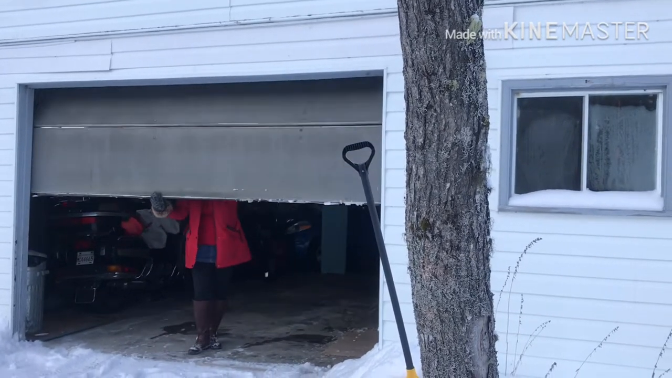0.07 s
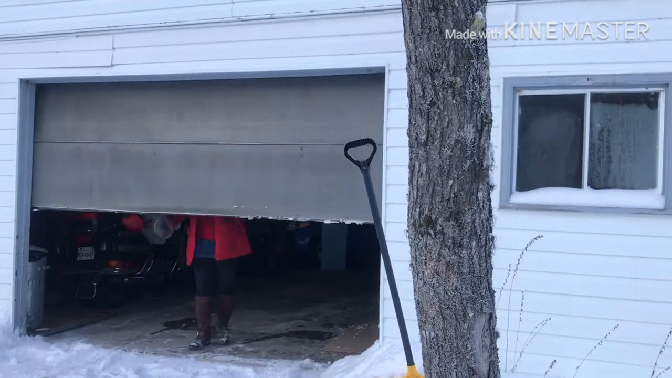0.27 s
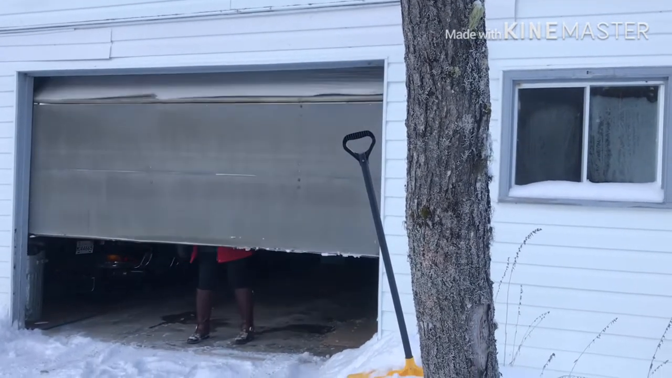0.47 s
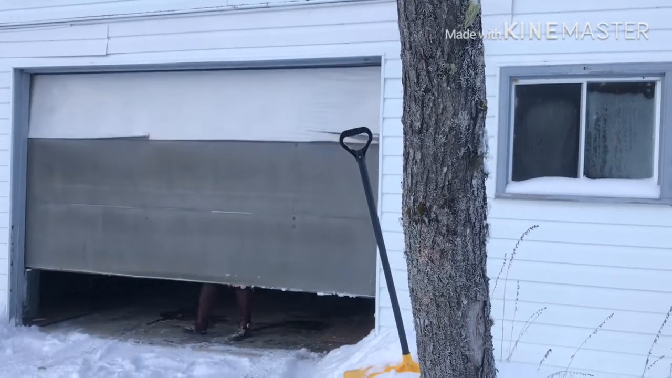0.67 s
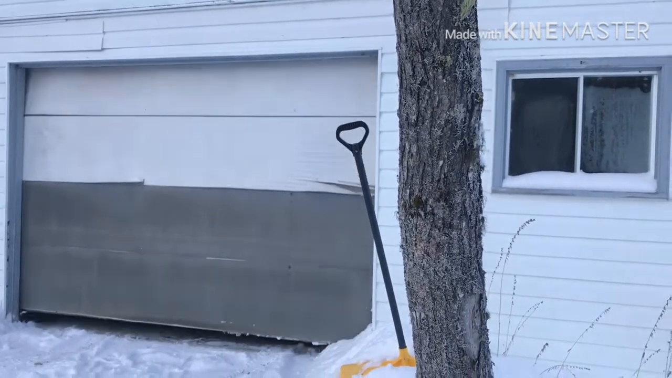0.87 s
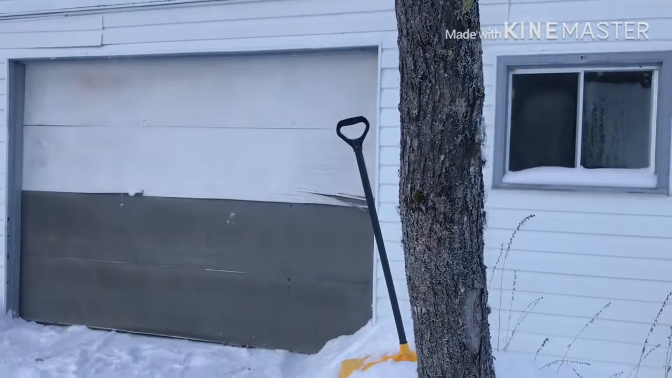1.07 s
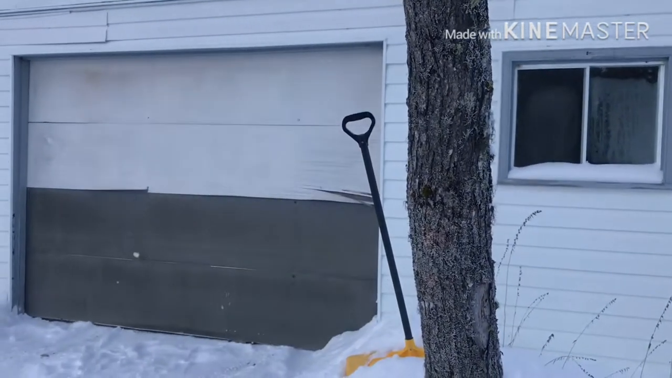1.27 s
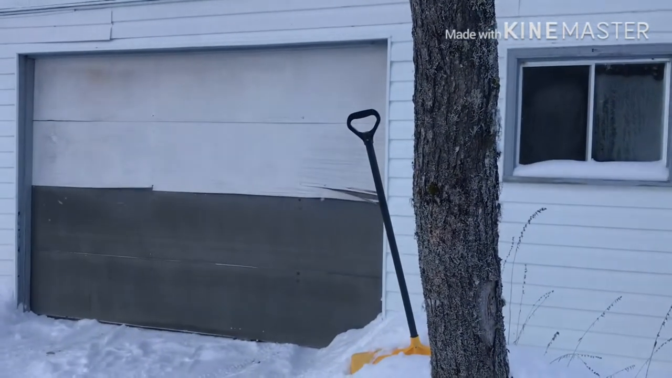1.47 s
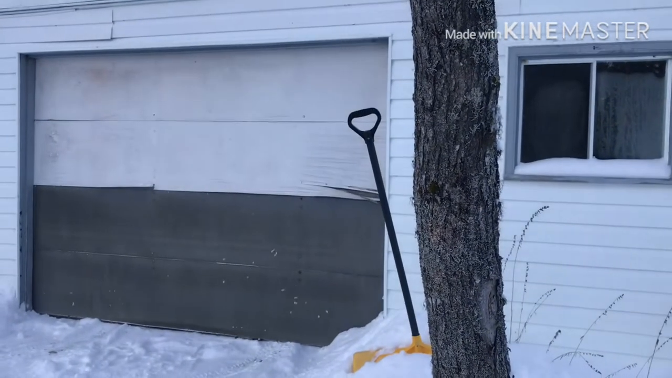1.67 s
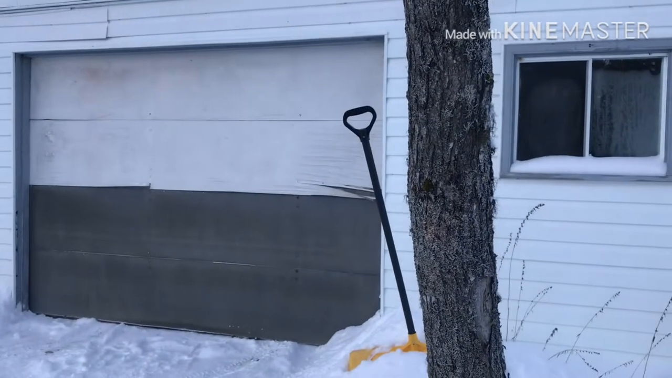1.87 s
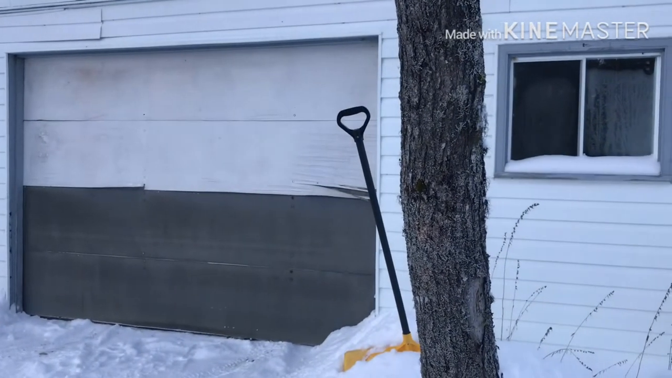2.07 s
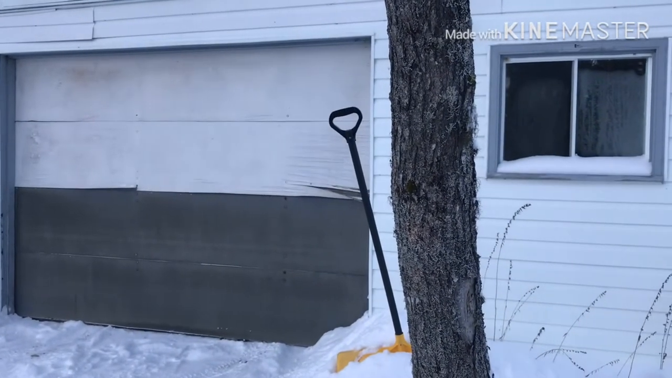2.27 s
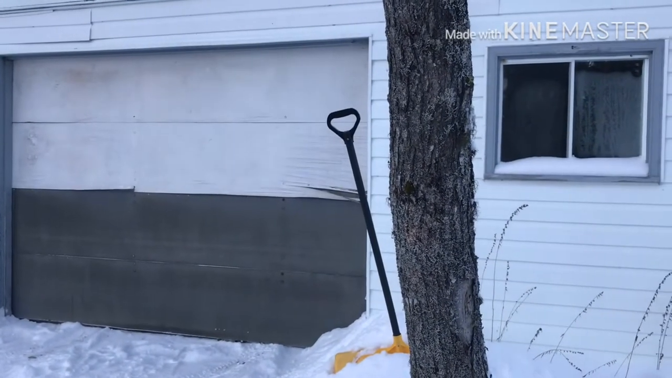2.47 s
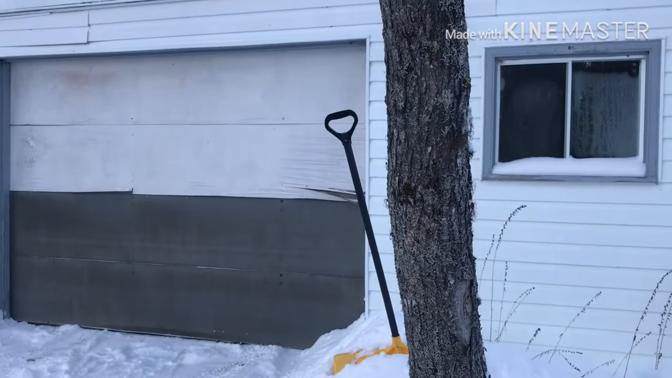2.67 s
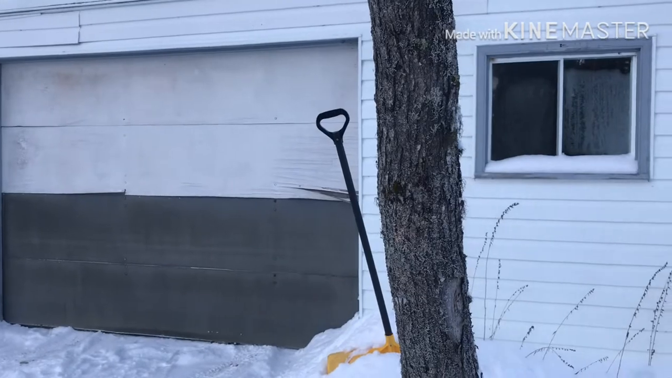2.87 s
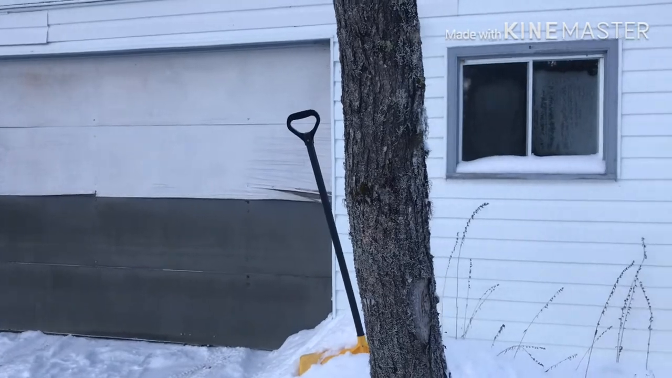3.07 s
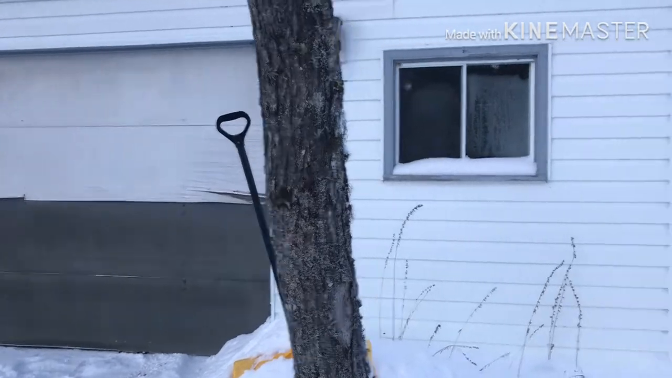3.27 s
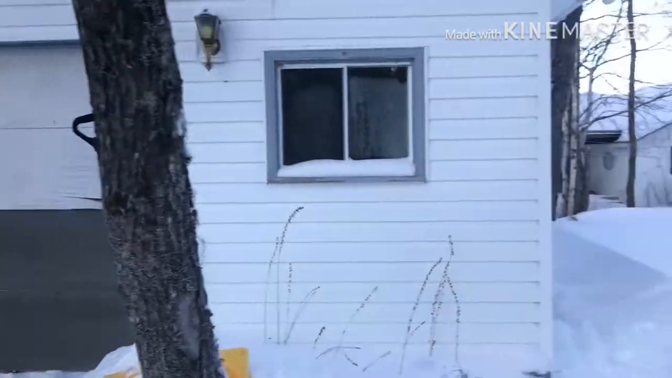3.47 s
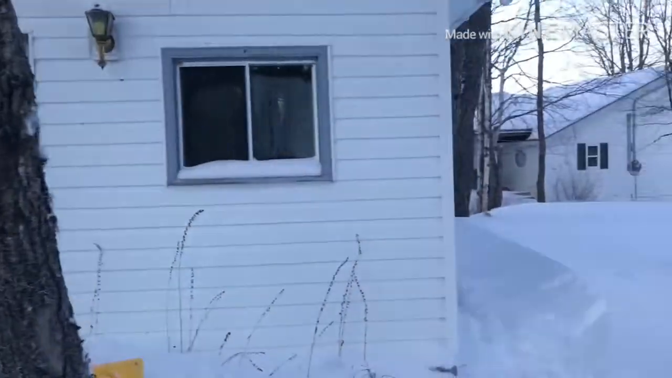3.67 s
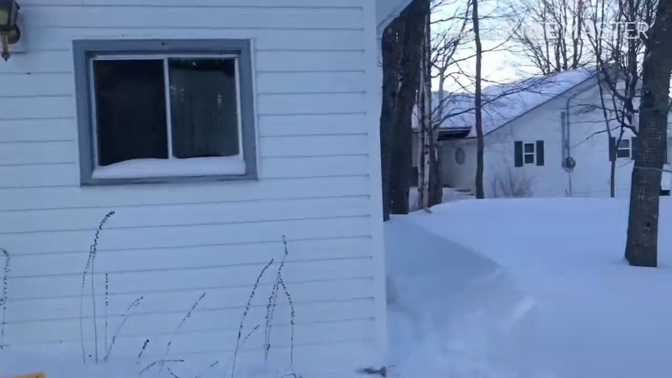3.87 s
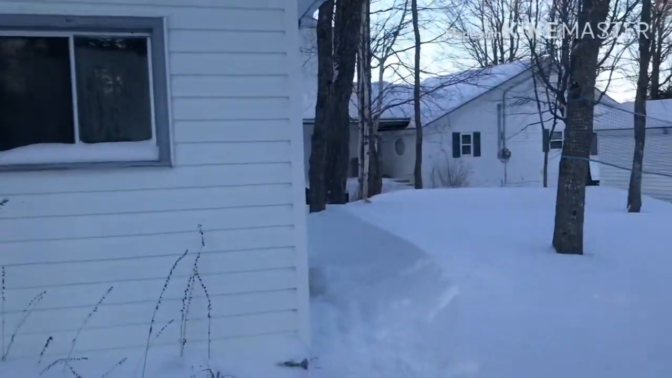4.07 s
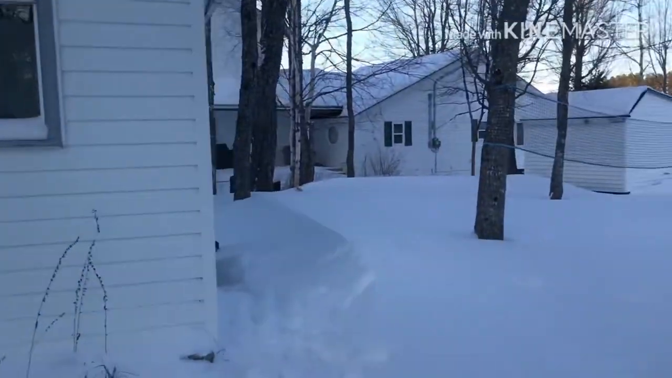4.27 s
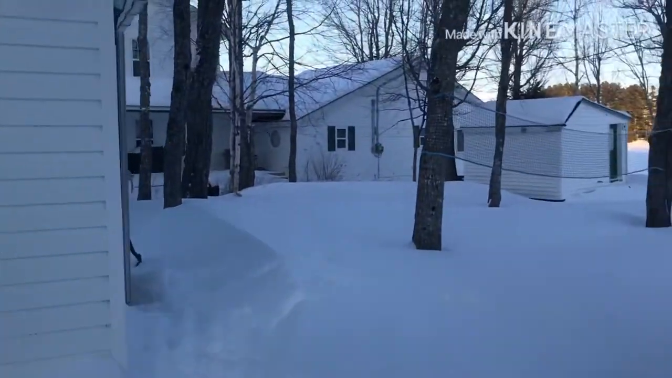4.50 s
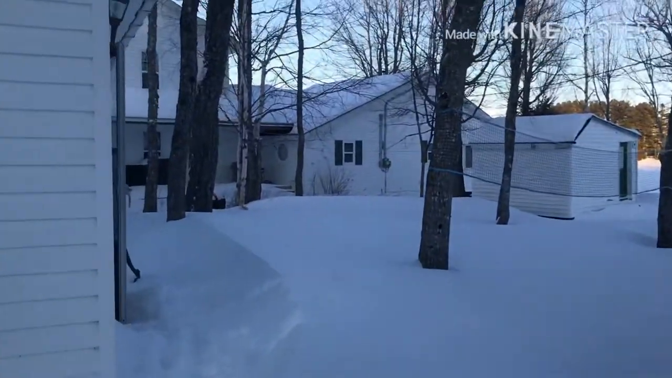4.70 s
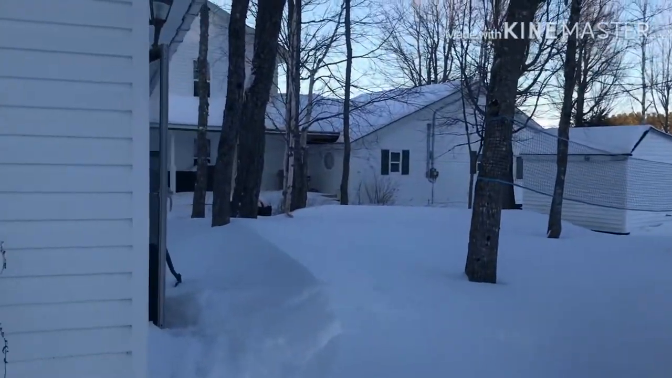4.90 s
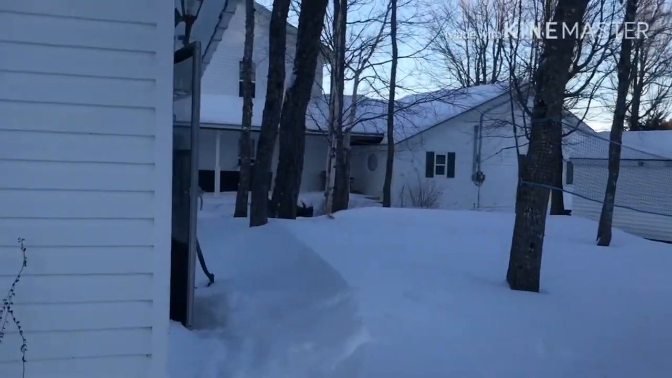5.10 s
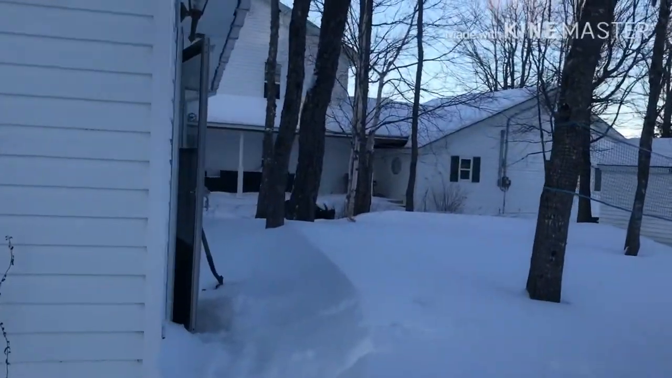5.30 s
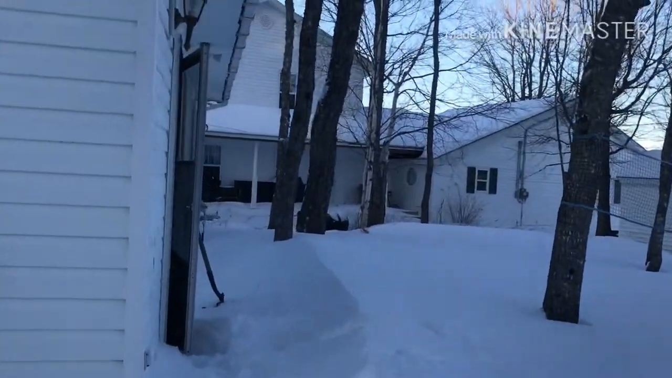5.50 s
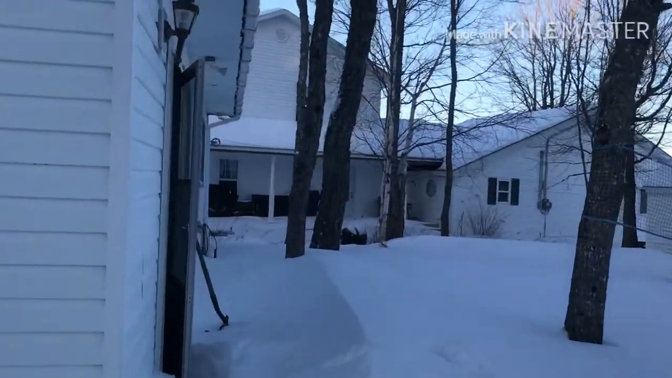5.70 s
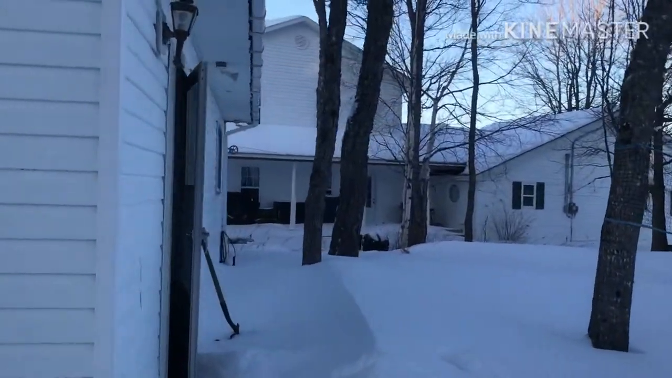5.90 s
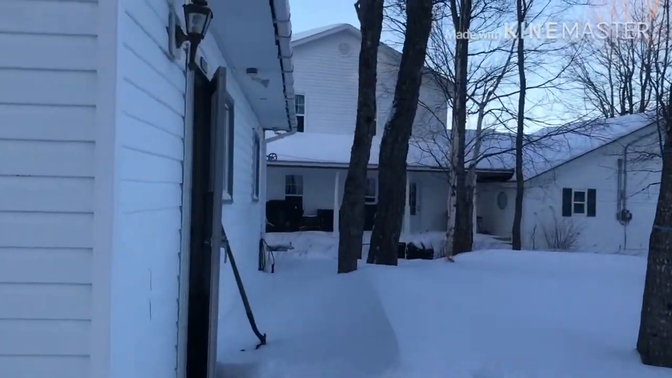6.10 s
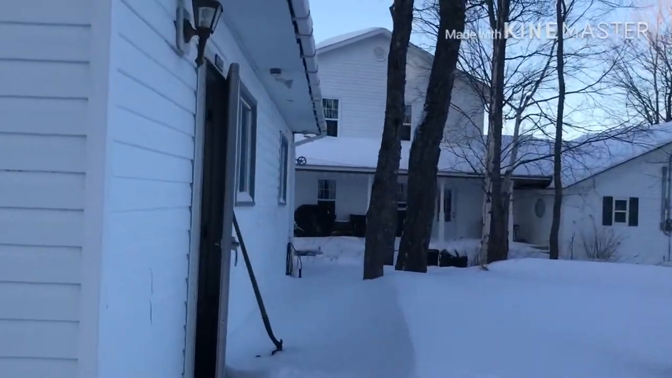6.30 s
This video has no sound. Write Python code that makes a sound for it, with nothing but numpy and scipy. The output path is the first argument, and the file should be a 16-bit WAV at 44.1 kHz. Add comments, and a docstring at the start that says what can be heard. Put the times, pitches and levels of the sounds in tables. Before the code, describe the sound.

From a few metres away, a garage door clatters down its tracks with dry knocks and one bright metallic ping, then slams with a boomy wooden thud and rattling bounces. After a pause the bolt clicks home. Beneath it an engine idles with a throbbing low hum. Later come crisp snow steps, cloth brushing and dull handling taps close to the microphone, while the engine weakens.

```python
"""A wooden sectional garage door is pulled down by hand on a still, snowy day: rollers rumble and knock, a steel
pin pings, and the door bangs on the ground and bounces; these are filtered clicks, noise bursts and ringing modes.
An idling engine, summed from orders of its firing rate, beats against a steady hum of sines. A latch snaps home;
later snow crunches underfoot in short rings, and gloves and coat near the microphone rustle in filtered clicks."""
import sys
import numpy as np
from scipy import signal
from scipy.fft import rfft, irfft
from scipy.io import wavfile

SR = 44100
rng = np.random.default_rng(int(sys.argv[2]) if len(sys.argv) > 2 else 0)


def output_pcm(signal):
    """Save a mono or channel-first signal as 16-bit PCM at the path in sys.argv[1].

    Samples are clipped to [-1, 1] before scaling.
    """
    pcm = np.clip(np.atleast_2d(signal).T, -1, 1) * 32767
    wavfile.write(sys.argv[1], SR, np.round(pcm).astype(np.int16))


N = 279946
TIME = np.arange(N) / SR
EDGES = 40 * 2 ** np.arange(0, 8.8, .5)   # half-octave band edges, Hz
TINY = 1e-18   # keeps the filters from underflowing in silence

# relative spectrum of a dry contact, shared by cracks, scrape and cloth: frequency_hz, level_db (per Hz)
CONTACT_SPECTRUM = [(200, -39), (600, -0.5), (1500, -0.5), (2600, 1.5), (3300, -1.5), (5500, -5.5),
                    (7500, -5), (10000, -13), (13500, -14), (16000, -12)]
# the microphone turns from the engine: time_s, loss_db (gain of the upper orders, other layers take a share)
TURNED_AWAY = [(1.3, -0.5), (2.6, 0.5), (4.0, -2), (4.5, -5.5), (5.2, -9.5), (6.35, -15)]


def amp(db):
    """Decibels to gain."""
    return 10 ** (np.asarray(db) / 20)


def rms_one(x):
    """Scale to unit rms."""
    return x / np.sqrt(np.mean(x ** 2) + 1e-20)


def in_time(rows, outside=None):
    """Columns of a table as sample curves; outside is the value beyond its ends."""
    s, *columns = np.transpose(rows)
    return [np.interp(TIME, s, column, outside, outside) for column in columns]


def at_hz(points, hz):
    """A spectrum read on a log-frequency axis."""
    point_hz, level_db = np.transpose(points)
    return np.interp(np.log(hz), np.log(point_hz), level_db)


def drift(rate_hz):
    """Slow random wander of spread 1: noise through two equal low-pass poles at rate_hz."""
    step = 40   # samples between the points that are drawn
    r = np.exp(-2 * np.pi * rate_hz * step / SR)
    white = rng.standard_normal(N // step + 2002)
    slow = signal.lfilter([1], [1, -2 * r, r * r], white)[2000:]   # settled part only
    return np.interp(np.arange(N) / step, np.arange(len(slow)), rms_one(slow))


def swell(peak_s, peak_db, rise_s, t60_s):
    """Gain that climbs 60 dB in rise_s to each peak and falls 60 dB in t60_s; powers add."""
    power = np.zeros(N)
    for s, db, fall_s in np.broadcast(peak_s, peak_db, t60_s):
        distance = np.maximum((s - TIME) / rise_s, (TIME - s) / fall_s)
        power += amp(2 * (db - 60 * distance))
    return np.sqrt(power)


def band_pass(x, low_hz, high_hz, order=2):
    """Keep one band of the signal."""
    return signal.sosfilt(signal.butter(order, [low_hz, high_hz], "band", fs=SR, output="sos"), x)


def bands(sources):
    """Half-octave bands as (centre Hz, signal); neighbours come from unrelated sources."""
    for k, (low, high) in enumerate(zip(EDGES, EDGES[1:])):
        yield np.sqrt(low * high), band_pass(sources[k % 2], low, high)


def low_noise(low_hz, high_hz):
    """A band of bass noise; rms 1."""
    return rms_one(band_pass(rng.standard_normal(N), low_hz, high_hz, order=3))


def coloured(spectrum):
    """Smooth noise with the given spectrum; rms 1."""
    hz = np.maximum(np.fft.rfftfreq(N, 1 / SR), 1)
    return rms_one(irfft(rfft(rng.standard_normal(N)) * amp(at_hz(spectrum, hz)), N))


def grains(per_s, spread_db):
    """Two trains of random clicks of uneven size and either sign."""
    luck = np.minimum(rng.exponential(1, (2, N)), 4)
    sizes = amp(spread_db * luck) * rng.choice([-1, 1], (2, N))
    hits = rng.random((2, N)) < per_s / SR
    return rms_one(sizes * hits) + TINY


def ring(modes, blows, spread_db, longest_s, lag_cycles):
    """Each blow (s, dB) strikes every decaying mode with a strength of its own; low modes answer later."""
    s, db = np.transpose(blows)
    luck = rng.normal(0, 1, (len(s), len(modes)))
    out = np.zeros(N)
    for k, (hz, level_db, t60_s) in enumerate(modes):
        r = amp(-60 / (np.clip(t60_s, .01, longest_s) * SR))
        w = 2 * np.pi * hz / SR
        clicks = np.full(N, TINY)
        at = ((s + lag_cycles / hz) * SR).astype(int)
        clicks[at] = amp(db + level_db + spread_db * luck[:, k]) * (-1) ** k
        out += signal.lfilter([0, np.sin(w)], [1, -2 * r * np.cos(w), r * r], clicks)
    return out


def cracks(rows, t60_s, snap_db, lows_last):
    """A sharp snap and a burst of noise that dies band by band, the lows more slowly; t60_s holds at 3 kHz."""
    out, after = np.zeros(N), TIME[:SR // 4]
    white = rng.standard_normal((2, N))
    rise_s = .0012   # the contact builds up before it snaps
    rise = np.minimum(after / rise_s, 1) ** 2
    for k, (low, high) in enumerate(zip(EDGES, EDGES[1:])):
        hz = np.sqrt(low * high)
        octaves = np.log2(hz / 3000)
        burst = rise * amp(-60 * after / (t60_s * (hz / 3000) ** -lows_last))
        shape, snaps = np.zeros(N + len(after)), np.zeros(N)
        for s, crack_db, tilt_db in rows:
            level_db = crack_db + at_hz(CONTACT_SPECTRUM, hz) + tilt_db * octaves
            i = int(s * SR)
            shape[i:i + len(after)] += amp(level_db) * burst
            snaps[i + round(rise_s * SR)] = amp(level_db + snap_db) * (-1) ** k
        out += band_pass(shape[:N] * white[k % 2] + snaps + TINY, low, high)
    return out


def rolling():
    """Rollers send dense clicks into panels and track, louder with speed and after each jolt."""
    # loudness of the rolling, following the door's speed: time_s, level_db
    roll_table = [(0.0, -37.5), (0.05, -49.5), (0.3, -49.5), (0.45, -43.5), (0.62, -43), (0.72, -41.5),
                  (0.83, -36.5), (0.92, -43.5), (0.95, -36.5), (1.2, -58), (1.45, -76)]
    # jolts that shake the whole door: time_s, panel_boom_db, wood_rumble_db, roller_rattle_db
    jolt_table = [(0.004, -43, -68, -57.5), (0.536, -49, -51, -38), (0.786, -39, -35, -47),
                  (0.828, -52, -32.5, -52), (0.873, -35.5, -49, -23), (0.888, -38, -29, -20.5),
                  (0.903, -37, -36, -31), (0.945, -22.5, -21.5, -27), (1.026, -32.5, -36, -32),
                  (1.068, -36, -46, -43), (1.105, -38.5, -48, -57), (1.118, -49, -39, -45),
                  (1.23, -41.5, -50, -50)]
    # relative spectra of the roller contact and its hiss: frequency_hz, level_db (per Hz)
    rumble_spectrum = [(150, -31), (230, -2), (400, 8), (620, 2), (900, 8), (1400, -1), (2200, -10),
                       (3200, -41)]
    hiss_spectrum = [(880, -57), (1500, 9.5), (2230, 7), (2390, 9.5), (3880, 2.5), (5770, 3), (7240, -1.5),
                     (14500, -11.5), (16000, -36)]
    boom_db, wood_db, hiss_db = -3.5, 1, -4   # rolling layers against the roller rattle
    jolt_rise_s, boom_lag_s, jolt_hiss_db = 0.062, 0.0064, -16.5   # the boom answers late

    contact = []
    for hz, band in bands(grains(per_s=1300.0, spread_db=2.8)):
        contact.append((hz, amp(at_hz(rumble_spectrum, hz) + 2.0 * drift(42.0)) * band))
    wood = rms_one(sum(band for hz, band in contact if hz < 650))
    rattle = rms_one(sum(band for hz, band in contact if hz > 650))
    hiss = 0
    for hz, band in bands(grains(per_s=6000.0, spread_db=1.2)):
        hiss = hiss + amp(at_hz(hiss_spectrum, hz) + 2.45 * drift(30.0)) * band

    roll = amp(in_time(roll_table, outside=-120)[0])
    s, jolt_boom_db, jolt_wood_db, jolt_rattle_db = np.transpose(jolt_table)
    boom_jolt = swell(s + boom_lag_s, jolt_boom_db, jolt_rise_s, t60_s=0.39)
    wood_jolt = swell(s, jolt_wood_db, jolt_rise_s, t60_s=0.28)
    rattle_jolt = swell(s, jolt_rattle_db, jolt_rise_s, t60_s=0.12)
    return (np.hypot(amp(boom_db) * roll, boom_jolt) * low_noise(51, 181)
            + np.hypot(amp(wood_db) * roll, wood_jolt) * wood
            + np.hypot(roll, rattle_jolt) * rattle
            + np.hypot(amp(hiss_db) * roll, amp(jolt_hiss_db) * rattle_jolt) * rms_one(hiss))


def knocks():
    """Hinges, rollers, the ground blow and its bounces crack and ring the panels."""
    # blows: time_s, level_db (of the crack, relative), tilt_db (per octave about 3 kHz)
    knock_table = [(0.0024, -29.5, -1), (0.159, -33.5, 1), (0.184, -32.5, -2), (0.2064, -31, 4.5),
                   (0.2239, -30, 2.5), (0.281, -43, -10.5), (0.372, -38, 5), (0.4242, -34, -3.5),
                   (0.4543, -30, -1), (0.473, -30.5, 0), (0.5104, -26, 5), (0.5221, -17, 1.5),
                   (0.531, -24, 7.5), (0.7048, -34, -1), (0.7428, -38, -12), (0.7573, -25.5, 2),
                   (0.7905, -21, 1.5), (0.845, -28, 1.5), (0.8576, -27, -1), (0.8739, -26, -10),
                   (0.9099, -30, 1), (0.9338, -30.5, -9.5), (0.9395, -12, -6), (0.9485, -30, 8.5),
                   (0.958, -27, 6.5), (1.0228, -29.5, 5), (1.0603, -36.5, 8), (1.0672, -52, 3),
                   (1.1159, -20, 0.5), (1.1457, -38, -3), (1.2314, -43, -3.5), (1.8195, -48, 1.5)]
    # modes of the panels: frequency_hz, level_db (relative), t60_s (held to 0.3 s at most)
    panel_modes = [(67, -11, 0.13), (102, -12, 0.26), (154, -19, 0.18), (207, -1, 0.063), (255, -7.5, 0.15),
                   (331, -9, 0.34), (409.5, -4, 0.41), (498, -15, 0.34), (636, -2, .15), (646, -44, 0.1),
                   (816, -4, 0.25), (1037, -5, 0.2), (1170, -39, 0.045), (1496, 6, 0.044),
                   (1620, -49, 0.035), (2230, -47, 0.055)]
    body_db, loss_per_tilt = -21, 1   # panels ring less after a bright knock (dB per dB per octave)
    blows = [(s, db + body_db - loss_per_tilt * tilt) for s, db, tilt in knock_table]
    panels = ring(panel_modes, blows, spread_db=3.0, longest_s=.3, lag_cycles=.5)
    return cracks(knock_table, t60_s=0.037, snap_db=10.5, lows_last=0.12) + panels


def pin():
    """A struck steel pin pings in a few high modes."""
    # modes of the pin: frequency_hz, level_db (relative), t60_s
    pin_modes = [(1330, -7, .095), (5289, -5, .17), (5357, -9, .14), (10008, -4, .2), (10080, -2, .11),
                 (15720, -16, .12)]
    # blows on the pin: time_s, level_db (before the mode levels)
    pin_blows = [(0.5203, -25), (.664, -68)]
    return ring(pin_modes, pin_blows, spread_db=.5, longest_s=.2, lag_cycles=0)


def engine():
    """Orders of the firing rate line up into pressure dips at the firings, over exhaust noise that swells with them."""
    # idle speed: time_s, firing_hz (before a slight random wander)
    firing_table = [(0.0, 45.55), (0.45, 44.97), (1.2, 45.26), (1.6, 44.81), (1.9, 45.87), (2.15, 44.76),
                    (2.65, 46.34), (3.1, 45.5), (3.6, 45.89), (3.98, 44.76), (4.35, 46.39), (4.85, 44.7),
                    (5.2, 45.93), (5.5, 45.4), (5.8, 46.49), (6.08, 44.45), (6.35, 45.47)]
    # orders of the firing rate: multiple, level_db (relative within each group)
    low_orders = [(1, -1), (1.5, -16), (2, 4.5), (2.5, -16.5), (3, -1)]
    upper_orders = [(4, -22.5), (5, -1.5), (6, -3), (7, -3), (8, -13), (9, -8.5), (10, -14)]
    # relative spectrum of the exhaust noise: frequency_hz, level_db (per Hz)
    exhaust_spectrum = [(35, -23), (60, -12), (88, 14), (130, 10), (200, 2), (330, 7.5), (450, -11),
                        (600, -7), (900, -59)]
    low_db, upper_db, exhaust_db = -54.5, -57, -51   # before the turning loss
    low_share, exhaust_share = 0.26, 0.42   # part of that loss, in dB

    (firing_hz,), (loss_db,) = in_time(firing_table), in_time(TURNED_AWAY)
    phase = 2 * np.pi * np.cumsum(firing_hz * (1 + .0003 * drift(6.0))) / SR
    low = sum(amp(db + 0.33 * drift(12.0)) * np.cos(k * phase) for k, db in low_orders)
    upper = sum(amp(db + 2.6 * drift(1.86)) * np.cos(k * phase) for k, db in upper_orders)
    orders = amp(low_db + low_share * loss_db) * low + amp(upper_db + loss_db) * upper
    exhaust_gain = amp(exhaust_db + exhaust_share * loss_db + 1.1 * drift(2.6))
    exhaust = coloured(exhaust_spectrum) * (1 + 0.083 * np.cos(phase)) * exhaust_gain
    return -np.sqrt(2) * orders + exhaust


def steady_tones():
    """An even hum of sines, close enough to the engine's second order to beat, and a thin high whine."""
    # hum partials: frequency_hz, level_db (rms, before drift and turning loss)
    hum_partials = [(83.1, -52), (166.2, -66)]
    # loudness of the whine: time_s, level_db (rms, before drift)
    whine_table = [(0, -87), (1.1, -88), (1.3, -81), (3.3, -82), (3.65, -94), (6.35, -88)]
    hum = sum(amp(db + 0.49 * drift(3.2)) * np.sin(2 * np.pi * hz * TIME) for hz, db in hum_partials)
    hum_gain = amp(0.12 * in_time(TURNED_AWAY)[0])   # a small share of the turning loss
    whine_hz = 13582 + 12.0 * drift(25.0)
    whine_gain = amp(in_time(whine_table)[0] + 3.0 * drift(13.0))
    whine = whine_gain * np.sin(2 * np.pi * np.cumsum(whine_hz) / SR)
    return np.sqrt(2) * (hum_gain * hum + whine)


def air():
    """Smooth outdoor hiss, and a faint far-off whirr of narrow resonances in noise."""
    # relative spectrum of the air: frequency_hz, level_db (per Hz)
    air_spectrum = [(300, -15.5), (450, -4), (600, -14.5), (850, -13.5), (1250, -9.5), (1900, -20.5),
                    (2800, -20.5), (4200, -23), (6000, -27), (7300, -28.5), (9000, -31.5), (11500, -34),
                    (13500, -31.5), (16000, -40)]
    # whirr peaks: frequency_hz, width_hz, level_db (relative)
    whirr_peaks = [(977, 21, -1.5), (1673, 91, -1.5), (2074, 40, -0.5), (3520, 40, -13), (3970, 30, -9.5),
                   (5470, 67, -11), (7900, 100, -12)]
    whirr, white = 0, rng.standard_normal(N)
    for hz, width_hz, db in whirr_peaks:
        r = np.exp(-np.pi * width_hz / SR)
        peak = signal.lfilter([1, 0, -1], [1, -2 * r * np.cos(2 * np.pi * hz / SR), r * r], white)
        whirr = whirr + amp(db + 1.2 * drift(3.0)) * rms_one(peak)
    return amp(-60 + .5 * drift(1.0)) * coloured(air_spectrum) + amp(-73) * whirr


def latch():
    """The bolt scrapes, snaps home and settles, ringing its plate."""
    # clicks of the bolt: time_s, level_db (of the crack, relative), tilt_db (per octave about 3 kHz)
    latch_clicks = [(2.0406, -34, -1), (2.0448, -30, -0.8), (2.0498, -17.5, 0.13), (2.0576, -49, -1.1),
                    (2.1032, -56, -1), (2.1219, -40.5, -0.87)]
    # modes of the plate: frequency_hz, level_db (relative), t60_s (held between 0.01 and 0.12 s)
    plate_modes = [(347, -9, 0.092), (400, -15, 0.089), (576, -14, 0.14), (647, -7, 0.09),
                   (853, -3.5, 0.095), (969, -10.5, 0.097), (1133, -6.5, 0.07), (1397, -9, 0.066),
                   (1687, -4, 0.034), (2160, -21, 0.029), (2480, 5, 0.0098), (2780, -16, 0.015),
                   (4890, -4, 0.019), (5080, -15, .09)]
    slide = 0
    for hz, band in bands(grains(per_s=2700.0, spread_db=2.9)):
        if hz > 500:
            slide = slide + amp(at_hz(CONTACT_SPECTRUM, hz) - 4.5 * np.log2(hz / 3000)) * band
    # the scrape swells until the bolt is home, then dies
    scrape = swell(2.045, -42, rise_s=0.18, t60_s=0.28) * rms_one(slide)
    body_db = -8   # plate against crack
    blows = [(s, db + body_db) for s, db, _ in latch_clicks]
    plate = ring(plate_modes, blows, spread_db=2.0, longest_s=.12, lag_cycles=3)
    return scrape + cracks(latch_clicks, t60_s=0.038, snap_db=1, lows_last=0.27) + plate


def snow_crunch():
    """Snow grains snap underfoot, each a short ring at one of 14 pitches; rms 1."""
    crunch = 0
    for hz in np.geomspace(750, 5500, 14):
        r = amp(-60 * hz / (9.0 * SR))   # each snap rings about nine cycles
        clicks = grains(per_s=220.0, spread_db=3.5)[0]
        snap = signal.lfilter([1 - r], [1, -2 * r * np.cos(2 * np.pi * hz / SR), r * r], clicks)
        crunch = crunch + amp(-2.5 * np.log2(hz / 1500)) * rms_one(snap)
    return rms_one(crunch)


def cloth_hiss():
    """Very dense small clicks in the high bands, each band flickering on its own; rms 1."""
    cloth = 0
    for hz, band in bands(grains(per_s=5500.0, spread_db=1.8)):
        if hz > 5000:
            cloth = cloth + amp(at_hz(CONTACT_SPECTRUM, hz) + 1.7 * drift(22.0)) * band
    return rms_one(cloth)


def footwork():
    """Turning on the spot and single steps raise the snow crunch and the cloth hiss."""
    # turning on the spot: time_s, crunch_db, cloth_db (before random lumps)
    shuffle_table = [(3.3, -78, -95), (3.6, -78, -82), (3.75, -60, -66.5), (4.0, -66.5, -67.5),
                     (4.4, -62.5, -72), (4.55, -98, -79), (4.95, -63, -72.5), (5.15, -96, -82),
                     (5.4, -62, -70), (5.7, -83, -77), (6.1, -68, -75), (6.35, -87, -70.5)]
    # steps and sleeve brushes: peak_s, crunch_db, cloth_db, t60_s
    step_table = [(3.875, -47, -75, 0.17), (3.92, -51, -77, 0.083), (4.04, -68, -71, 0.12),
                  (4.55, -74, -63.5, .15), (4.62, -57, -67, .12), (4.685, -56.5, -62, .25),
                  (5.46, -51.5, -56.5, .4), (5.487, -45.5, -67, 0.2), (5.515, -48, -59, 0.12),
                  (5.68, -57, -59, .15), (6.125, -75, -60, 0.17), (6.179, -75, -58, 0.14)]
    s, crunch_db, cloth_db, t60_s = np.transpose(step_table)
    lumps_db = 1.5 * drift(6.4)
    shuffle_crunch, shuffle_cloth = amp(in_time(shuffle_table, outside=-120) + lumps_db)
    step_rise_s = 0.059
    crunch_gain = np.hypot(shuffle_crunch, swell(s, crunch_db, step_rise_s, t60_s))
    cloth_gain = np.hypot(shuffle_cloth, swell(s, cloth_db, step_rise_s, t60_s))
    return crunch_gain * snow_crunch() + cloth_gain * amp(3.1 * drift(43.0)) * cloth_hiss()


def handling():
    """Gloves creak and tap, fingers knock dull modes of the case, and a heavy step shakes the microphone."""
    # glove creaks and taps: time_s, level_db (of the crack, relative), tilt_db (per octave about 3 kHz)
    creak_table = [(3.582, -42.5, -8.5), (3.975, -37.5, -5), (4.126, -41, -1), (4.181, -44.5, -8.5),
                   (4.215, -52, -10), (4.312, -42.5, -6), (4.388, -38.5, -5), (4.43, -42, 0),
                   (4.571, -47, -2), (4.615, -53, 0), (4.754, -52, 1), (4.814, -47, -8), (4.865, -51, -10),
                   (4.898, -50.5, -9), (4.936, -39, -8.5), (5.058, -44.5, -9), (5.282, -42, -3),
                   (5.33, -42, -7.5), (5.37, -54, -9), (5.396, -52, -8), (5.476, -43, -3.5),
                   (5.735, -44.5, 0), (5.777, -42, -5), (5.839, -48.5, -8), (5.88, -46, -5),
                   (5.908, -47, -4), (5.934, -43.5, -6.5), (5.99, -52, -11), (6.07, -42, -4.5),
                   (6.143, -45, -5), (6.252, -50, -9.5), (6.315, -44, -3)]
    # dull knocks of the fingers: time_s, level_db (before the mode levels)
    thud_table = [(4.218, -35.5), (4.256, -43), (4.315, -43), (4.427, -44), (4.705, -33), (4.762, -34.5),
                  (4.816, -34), (4.868, -38), (5.309, -44), (5.334, -41), (5.368, -31.5), (5.4, -38),
                  (5.784, -43), (5.844, -33), (5.888, -40), (5.934, -37), (5.991, -50), (6.14, -50),
                  (6.249, -45)]
    # modes of the case: frequency_hz, level_db (relative), t60_s
    case_modes = [(107, -13, 0.068), (193, -5.5, 0.06), (316, -4.5, 0.02), (460, -9, 0.023)]
    creaks = cracks(creak_table, t60_s=0.013, snap_db=10, lows_last=0.24)
    thuds = ring(case_modes, thud_table, spread_db=2.5, longest_s=.08, lag_cycles=0)
    thump = swell(5.49, -38, rise_s=0.21, t60_s=0.31) * low_noise(52, 145)
    return creaks + thuds + thump


def scene():
    """All sources over the faint outdoor air."""
    door = rolling() + knocks() + pin()
    background = engine() + steady_tones() + air()
    return (door + background + latch() + footwork() + handling())[None]


def record(dry):
    """The microphone drops the deepest bass and dips in the lower treble; the top is cut."""
    dip_hz, dip_width_hz, dip_share = 7370, 2500, 0.51
    dry = signal.sosfilt(signal.butter(6, 40, "high", fs=SR, output="sos"), dry)
    dip = signal.lfilter(*signal.iirpeak(dip_hz, dip_hz / dip_width_hz, fs=SR), dry)
    top_cut = signal.ellip(10, .5, 70, 15800, fs=SR, output="sos")   # steep low-pass, Hz
    return signal.sosfilt(top_cut, dry - dip_share * dip)


dry = scene()
out = record(dry)
output_pcm(out)
```